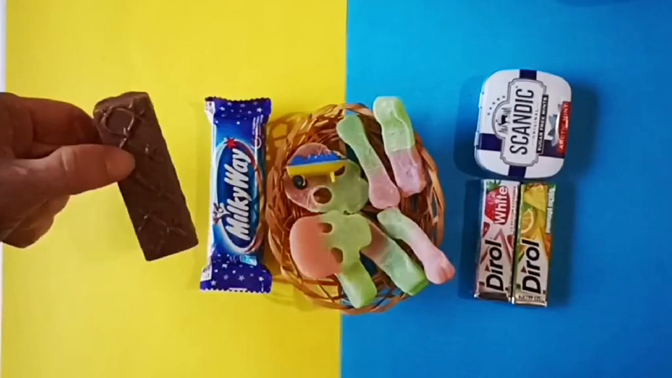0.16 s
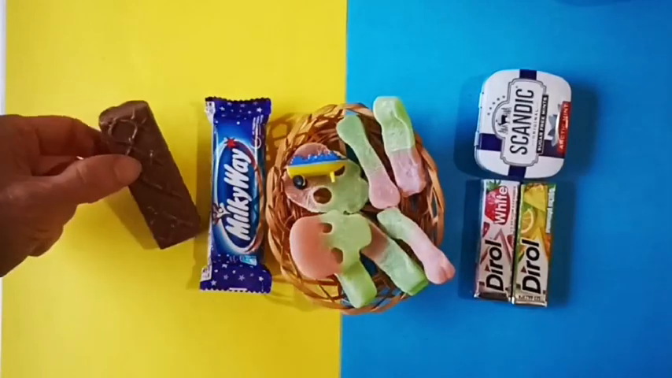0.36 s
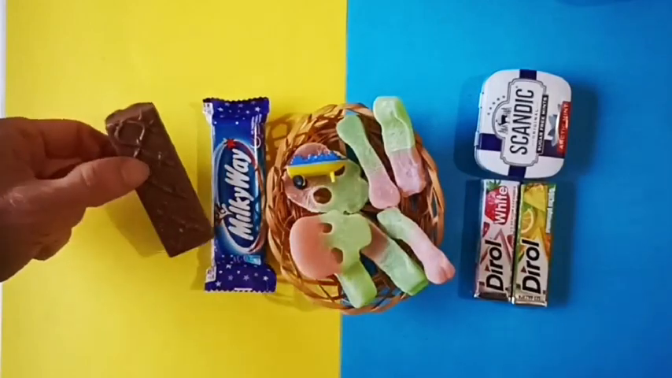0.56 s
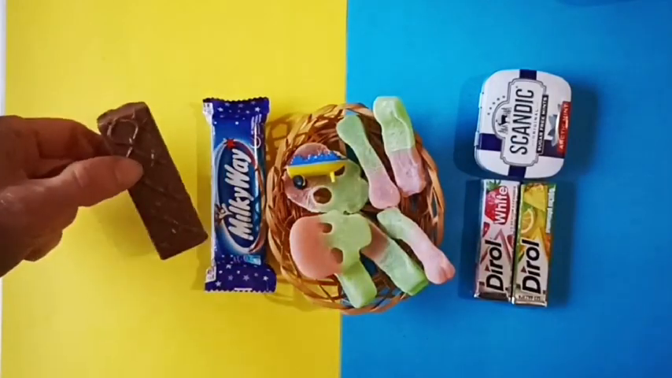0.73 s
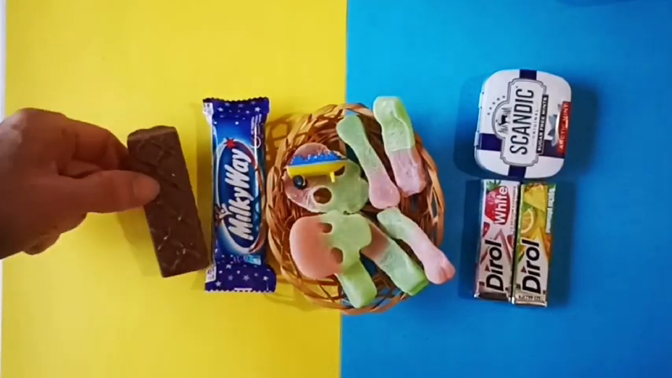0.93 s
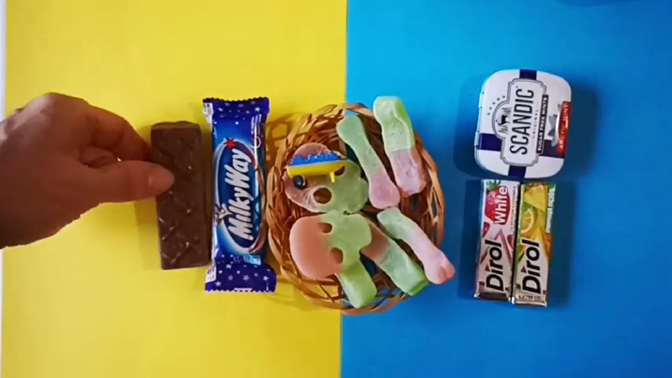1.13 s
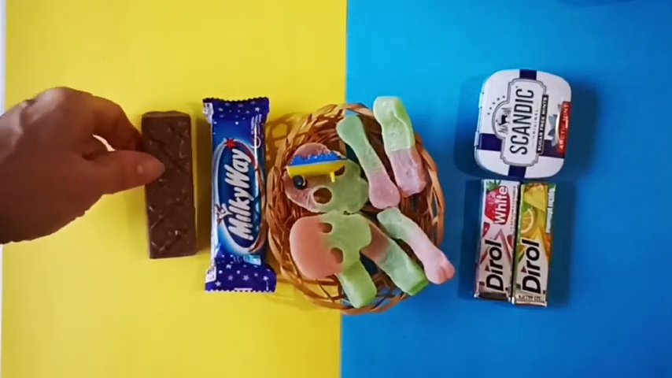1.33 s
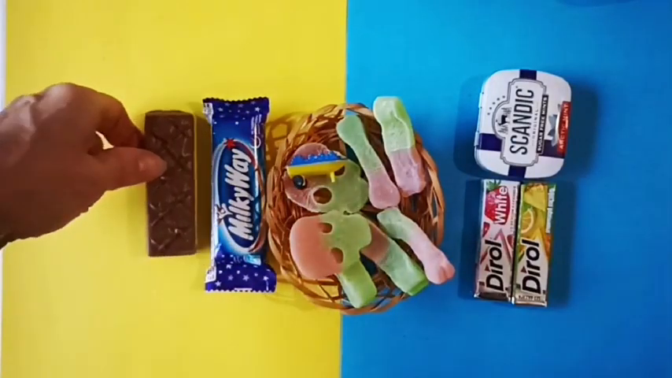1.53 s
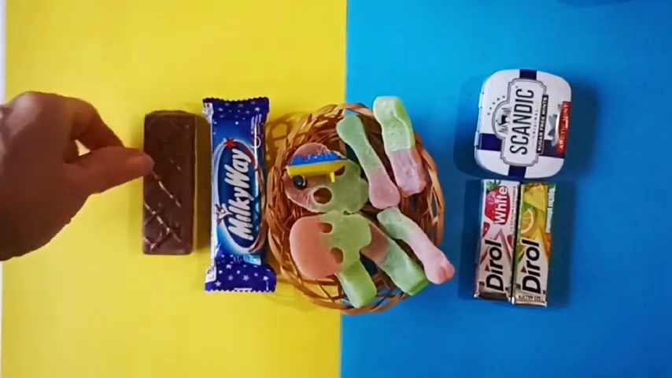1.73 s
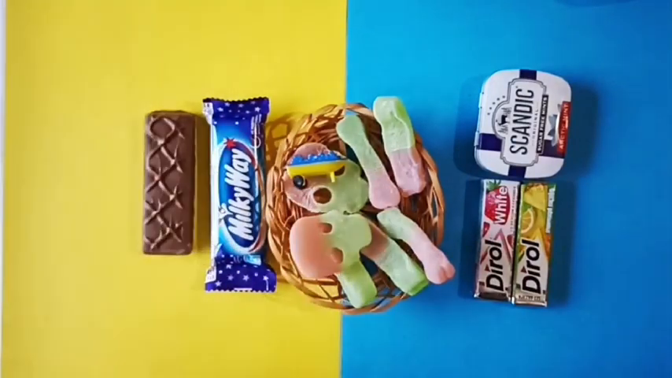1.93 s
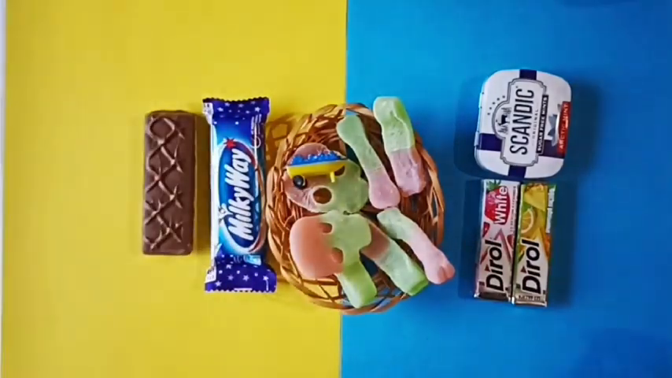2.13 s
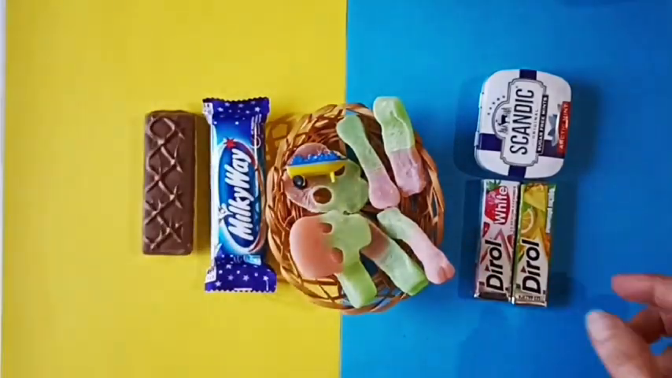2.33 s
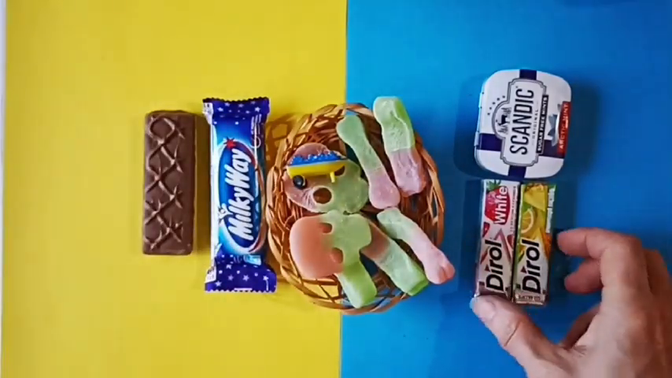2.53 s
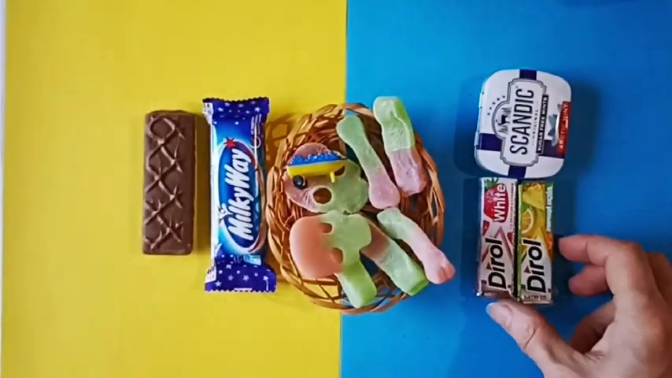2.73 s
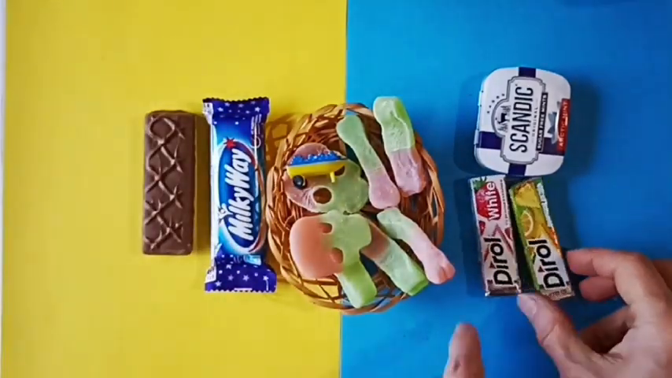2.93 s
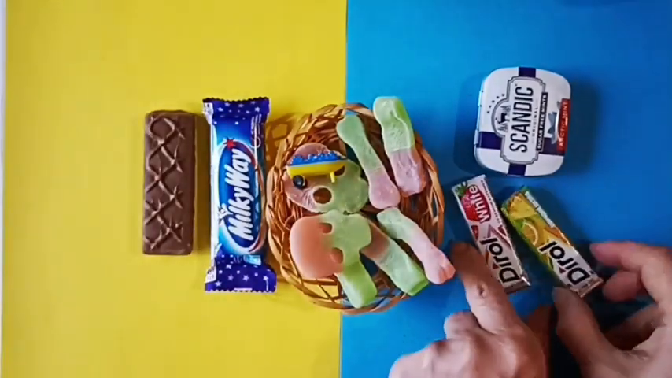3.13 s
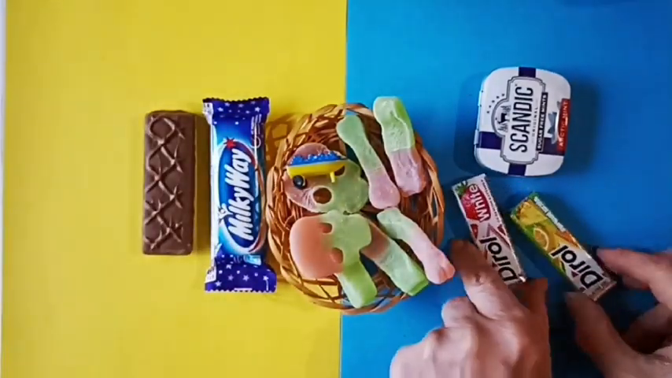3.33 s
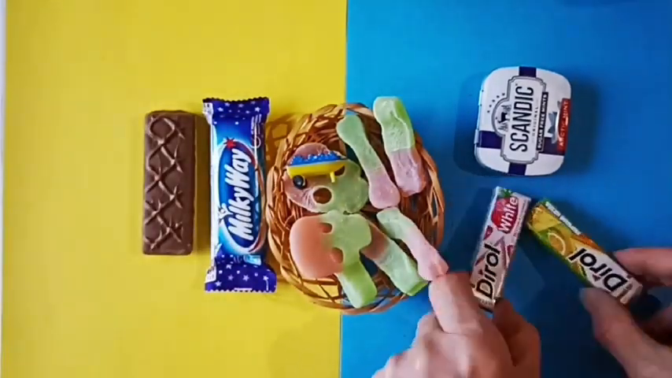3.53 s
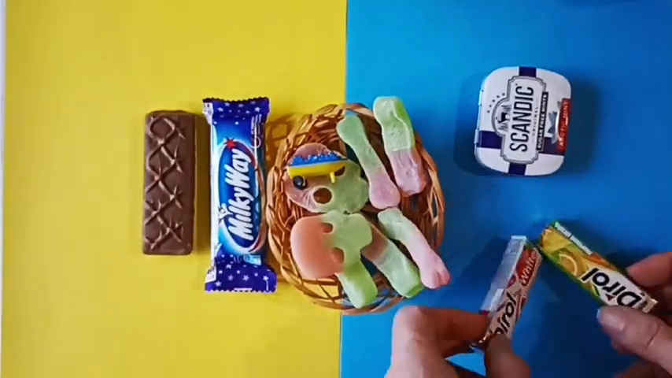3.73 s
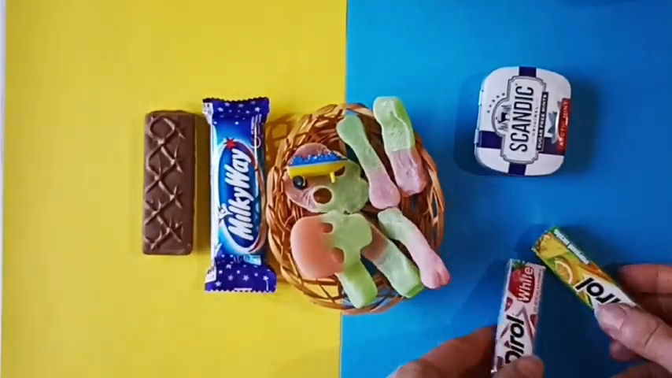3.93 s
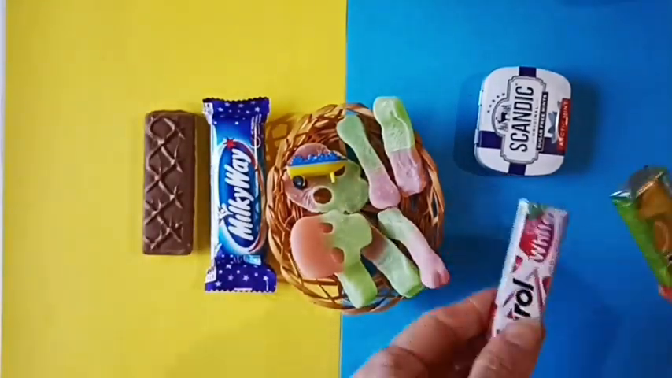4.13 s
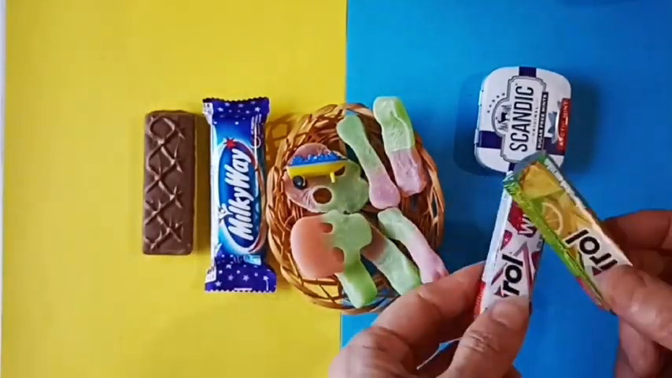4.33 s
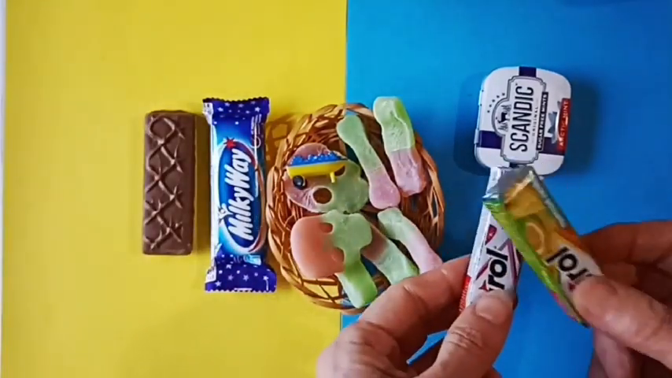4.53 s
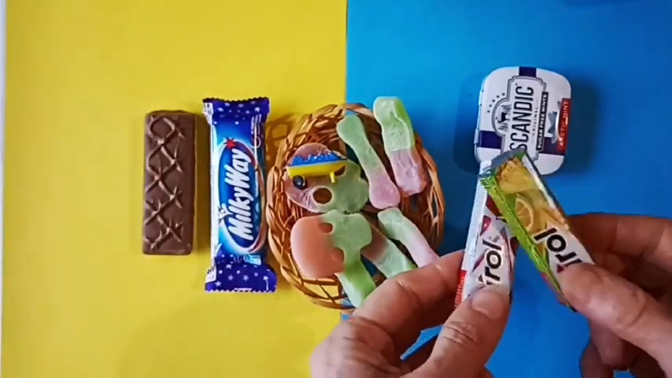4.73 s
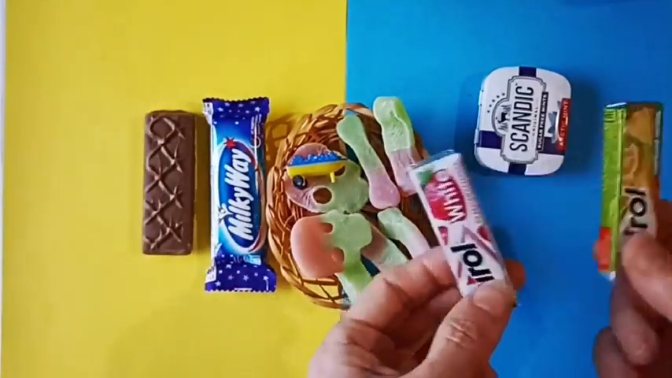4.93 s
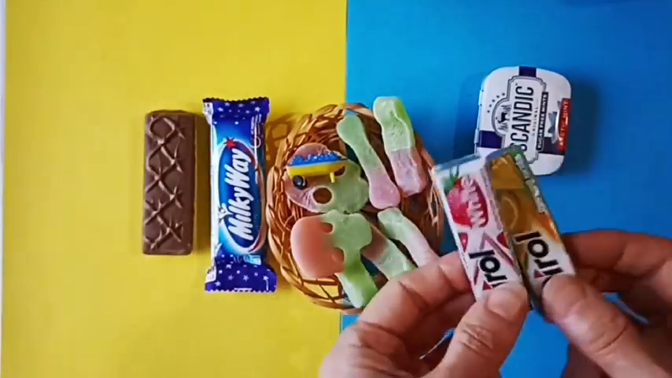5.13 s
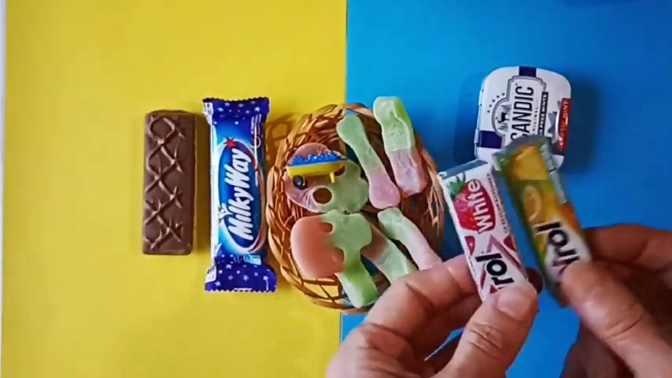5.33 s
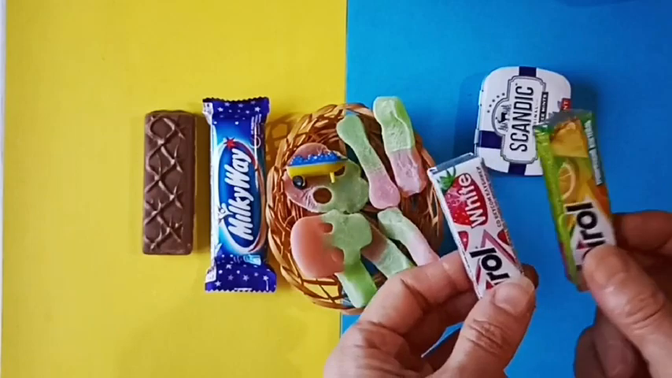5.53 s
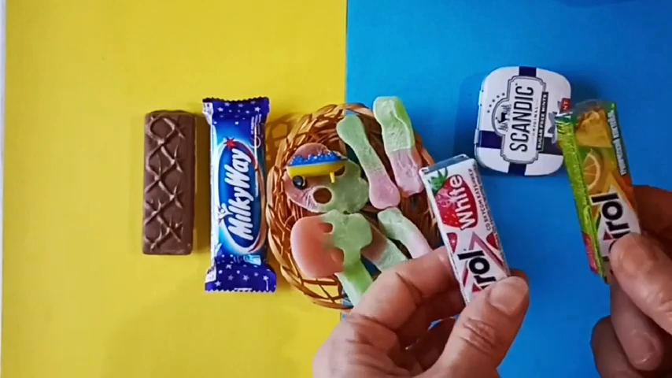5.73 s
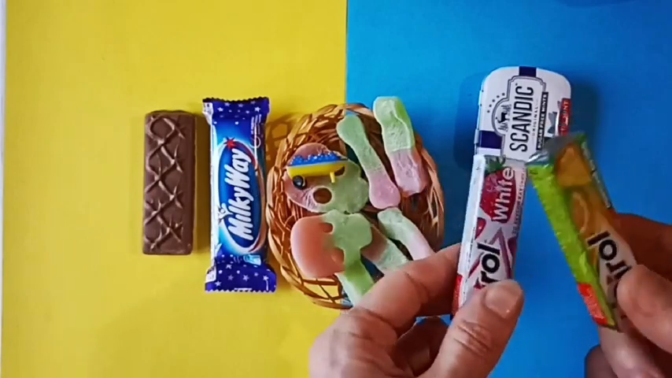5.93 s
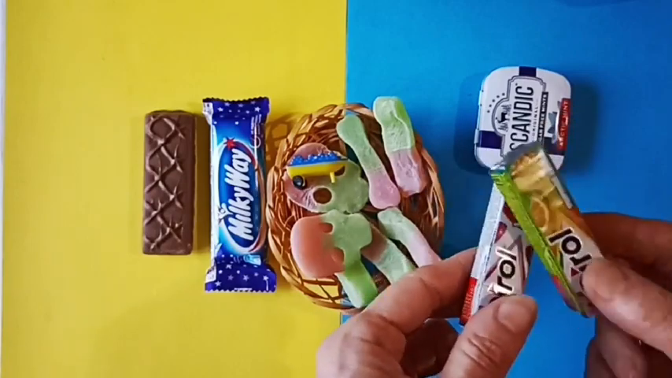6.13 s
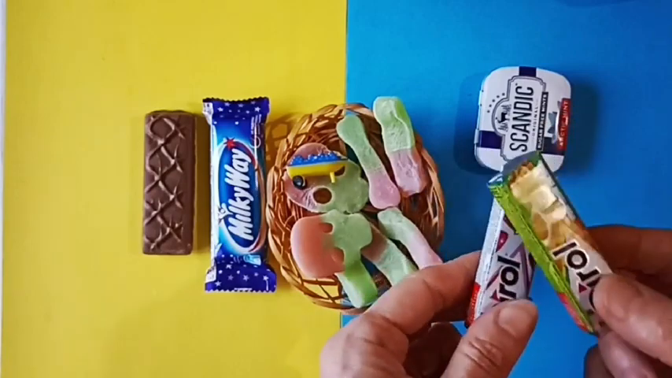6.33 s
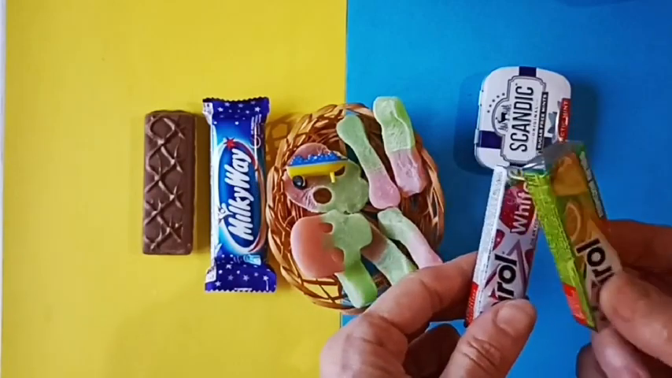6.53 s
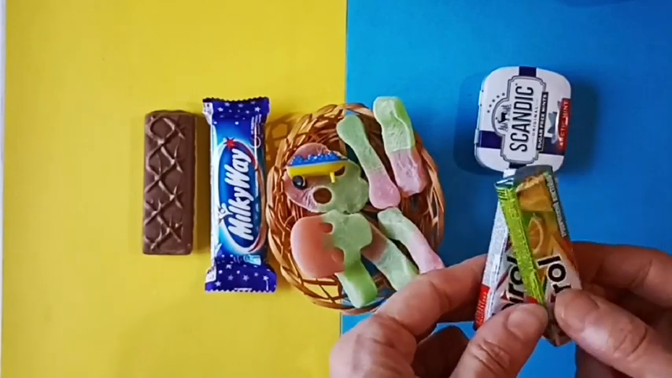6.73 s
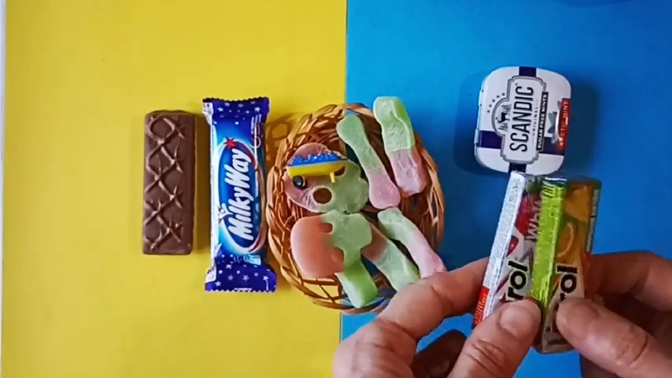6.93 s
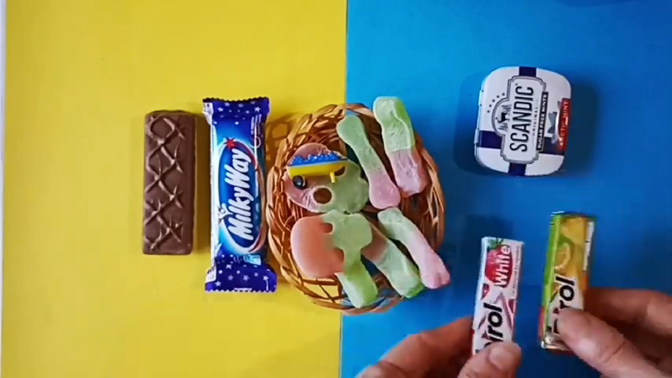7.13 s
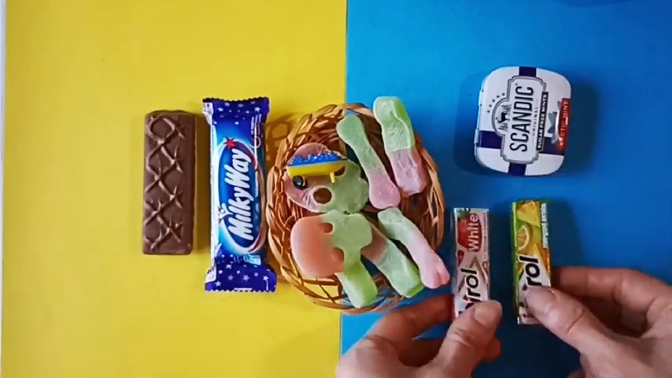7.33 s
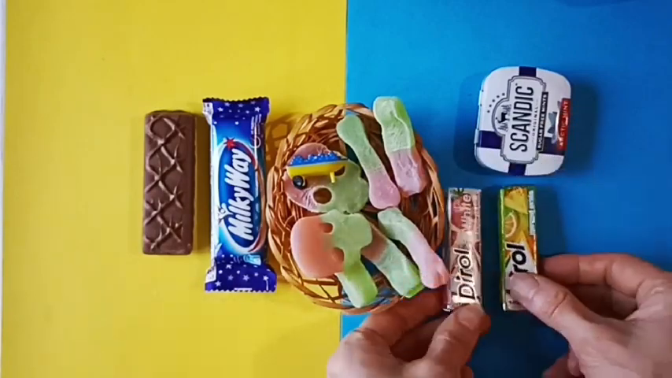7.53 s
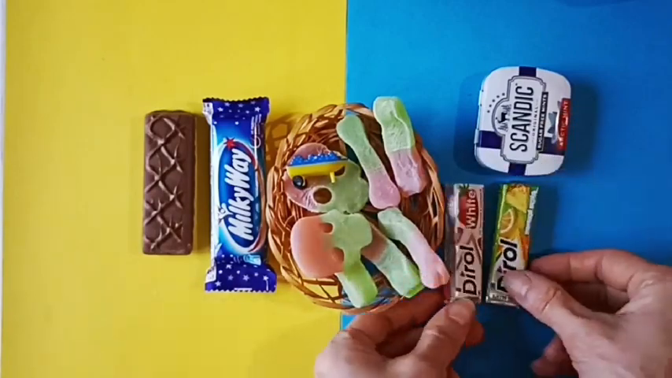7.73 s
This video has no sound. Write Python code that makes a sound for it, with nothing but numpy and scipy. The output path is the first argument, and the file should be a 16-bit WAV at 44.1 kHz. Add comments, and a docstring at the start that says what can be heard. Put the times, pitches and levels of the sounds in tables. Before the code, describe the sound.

A faint room hum lies under close, dry handling sounds. From about 0.3 to 0.7 seconds, slightly to the left, fingers rub a chocolate bar with a fine hiss and tap it lightly on a table three times. It is laid down with one more soft knock at 1.7 seconds. From 2.5 seconds, slightly to the right, two foil-wrapped gum packs are slid and lifted, rustling quietly with scattered crease snaps, the clearest at 3.5 seconds. Then comes the loudest part: the packs are brushed briskly across each other in three groups of four or five short strokes, at about 4.3 to 4.8, 5.0 to 5.6 and 6.0 to 6.6 seconds. Each stroke is a crisp foil scrape, many with a sharp, slightly hollow click as the ends catch. Light rustling and ticks follow, and the packs are put down with a soft scuff around 7.7 seconds.

```python
"""A quiet room hums, close to a small pair of microphone ports. Fingers rub a chocolate bar, tap it and
lay it on a table, whose damped modes answer each impact. They then slide two foil-wrapped gum packs
about and lift them: the wrappers rustle through many micro-contacts, and single creases snap. The packs
are brushed briskly across each other in three groups of strokes, foil chattering on foil, the ends
catching and the hollows resonating. Last, the packs are put down with a scuff."""
import sys
import numpy as np
from scipy import signal
from scipy.io import wavfile
from scipy.ndimage import uniform_filter1d, map_coordinates

SR = 44100
rng = np.random.default_rng(int(sys.argv[2]) if len(sys.argv) > 2 else 0)


def transcribe(signal):
    """Save signal, clipped to [-1, 1], as a 16-bit WAV file at the path in sys.argv[1]."""
    frames = np.atleast_2d(signal).T
    limited = np.clip(frames, -1, 1)
    pcm = np.round(limited * 32767).astype(np.int16)
    wavfile.write(sys.argv[1], SR, pcm)


N = 347062

# normal modes of the table top: f/Hz, level/dB, T60/s
TABLE_MODES = [(111, -12, 0.1622), (138, -3, .04), (215.94, -4, 0.03148), (283.74, -7, 0.077),
               (391.5, -0.5, 0.035), (473, -6.5, 0.013), (630, -10, 0.043), (763, -6.5, 0.016),
               (877, -15, 0.087), (1042.3, -25, 0.048)]
# spectrum of foil scraping on foil: f/Hz, level/dB
FOIL_SPECTRUM = [(590, -26.5), (1000, -8.5), (1180, -18), (1550, -5), (1750, -7), (1910, -4), (2560, -3.5),
                 (2680, -3.5), (3190, 0), (3800, -9), (5500, -6.5), (10100, -19.5), (12500, -16.5),
                 (14800, -19), (16000, -33)]


def from_db(db):
    """Amplitude ratio of a level in decibels."""
    return 10 ** (np.asarray(db) / 20)


def unit_rms(x):
    """Normalisation to a mean square of one."""
    return x / np.sqrt(np.mean(x ** 2) + 1e-20)


def colour(x, spectrum, size=4096):
    """Minimum-phase filter: the phase follows from the log gain by the Hilbert transform."""
    hz, db = np.transpose(spectrum)
    grid = np.abs(np.fft.fftfreq(size, 1 / SR)) + 1
    log_gain = np.interp(np.log(grid), np.log(hz), db) * np.log(10) / 20
    kernel = np.fft.ifft(np.exp(np.conj(signal.hilbert(log_gain)))).real
    return signal.oaconvolve(x, kernel[:size // 2])[:N]


def resonate(x, hz, width_hz):
    """Second-order resonance with unit gain at its peak."""
    r = np.exp(-np.pi * width_hz / SR)
    poles = [1, -2 * r * np.cos(2 * np.pi * hz / SR), r * r]
    return signal.lfilter([(1 - r * r) / 2, 0, (r * r - 1) / 2], poles, x + 1e-18)


def grit(per_s, spread_db):
    """Shot noise: a Poisson train of micro-contacts of uneven size, at unit rms."""
    sizes = from_db(spread_db * np.minimum(rng.exponential(1, N), 5)) * rng.choice([-1, 1], N)
    return unit_rms(sizes * (rng.random(N) < per_s / SR))


def wander(per_s):
    """Random drift: linear interpolation between Gaussian values."""
    steps = np.arange(0, N + SR, SR / per_s)
    return np.interp(np.arange(N), steps, rng.standard_normal(len(steps)))


def swells(times, peak_db, hold, fade, rise_db_per_s):
    """Exponential envelopes: each peaks at its time, holds, then loses 20 dB every fade seconds."""
    out, t = np.zeros(N), np.arange(N) / SR
    for s, db, hold_s, fade_s in np.broadcast(times, peak_db, np.abs(hold), np.abs(fade)):
        near = slice(max(round((s - .2) * SR), 0), round((s + .6) * SR))
        since = t[near] - s
        rise_db = rise_db_per_s * np.minimum(since, 0)
        decay_db = 20 * np.maximum(since - hold_s, 0) / fade_s
        out[near] += from_db(db + rise_db - decay_db)
    return out


def impacts(times, peak_db, shape, t60):
    """Impulsive excitation: a spike and decaying noise pass through shape(x, k), scaled to peak k."""
    out, size = np.zeros(N + SR), SR // 16
    noise = rng.standard_normal((len(times), size))
    noise[:, 0] = 3.66
    decay = from_db(-60 * np.arange(size) / (t60 * SR))
    for k, (s, gain) in enumerate(zip(times, from_db(peak_db))):
        sound = shape(noise[k] * decay, k)[:size]
        at = round(s * SR)
        out[at:at + size] += gain * sound / np.abs(sound).max()
    return out[:N]


def room_tone():
    """Background noise, partly coherent in the bass; narrow-band noise beats with a steady hum."""
    # spectrum of the background: f/Hz, level/dB
    air_spectrum = [(15, -50.5), (25, -15), (153, 0.5), (439, -5), (545, -9.5), (734, -7.5), (818, -12),
                    (2000, -18), (3430, -18.5), (3920, -23.5), (6560, -25.5), (7110, -30), (10400, -30.5),
                    (13600, -24), (16000, -31.5)]
    air_db, hum_db, hum_hz, width_hz = -66, -63.5, 147.1, 25
    left, right, shared = rng.standard_normal((3, N))
    bass = 0.74 * signal.lfilter(*signal.butter(1, 180, fs=SR), shared)
    air = np.array([unit_rms(colour(own + bass, air_spectrum)) for own in (left, right)])
    wavering = resonate(resonate(rng.standard_normal(N), hum_hz, width_hz), hum_hz, width_hz)
    tone = np.sqrt(2) * np.sin(2 * np.pi * hum_hz * np.arange(N) / SR)
    return from_db(air_db) * air + from_db(hum_db) * (tone + 0.31 * unit_rms(wavering))


def finger_rubs():
    """Sliding friction: dry skin on the smooth bar gives a fine, bright hiss."""
    # skin rubbing the bar: t/s, hold/s, level/dB
    rubs = [(0.293, .012, -69), (0.421, 0.022, -56), (0.562, .034, -52), (0.612, 0.041, -60.5),
            (2.172, 0.017, -73.5), (2.283, .002, -69.5)]
    # spectrum of skin friction: f/Hz, level/dB
    skin_spectrum = [(710, -70), (1700, -19), (2920, -0.5), (3950, -4), (5780, -0.5), (10600, -7),
                     (13000, 0.5), (14800, -2.5), (16000, -48)]
    at, hold, db = np.transpose(rubs)
    hiss = unit_rms(colour(grit(per_s=11000, spread_db=1.7), skin_spectrum))
    return swells(at, db, hold, fade=0.018, rise_db_per_s=2500) * hiss


def table_top(force, strength_db):
    """Modal superposition: each mode is a damped oscillator, driven with its own strength."""
    out = 0
    for (hz, level_db, t60), extra_db in zip(TABLE_MODES, strength_db):
        r, w = from_db(-60 / (t60 * SR)), 2 * np.pi * hz / SR
        mode = signal.lfilter([0, np.sin(w)], [1, -2 * r * np.cos(w), r * r], force)
        out = out + from_db(level_db + extra_db) * mode
    return out


def knocks():
    """Impact: the surface ticks, then a force pulse rings the table; a flat landing favours low modes."""
    # the bar landing: t/s, thud level/dB, tick level/dB, tilt of the thud/(dB per octave)
    landings = [(0.341, -27, -39.5, 5), (0.502, -27, -40.5, 5.5), (0.631, -50.5, -48, 2.5),
                (0.652, -34.5, -44, 4.5), (1.673, -26.5, -31, 1.5)]
    at, thud_db, tick_db, tilt = np.transpose(landings)
    octaves = np.log2(np.array(TABLE_MODES)[:, 0] / 300)
    strength_db = rng.normal(0, 2.3, (len(at), len(TABLE_MODES))) + np.outer(tilt, octaves)
    thuds = impacts(at + 0.00106, thud_db, lambda x, k: table_top(np.abs(x), strength_db[k]), t60=0.0021)
    ticks = impacts(at, tick_db, lambda x, k: resonate(x, 3860, 1600) + 0.085 * x, t60=0.011)
    return thuds + ticks


def scuffs():
    """Forced vibration: sparse contacts drive the table's modes as the sweets settle."""
    # sweets settling: t/s, hold/s, level/dB
    settling = [(0.632, .02, -46), (1.241, .004, -59.5), (7.692, 0.031, -53.5), (7.823, 0.025, -51)]
    at, hold, db = np.transpose(settling)
    rumble = unit_rms(table_top(grit(per_s=600, spread_db=1.0), np.zeros(len(TABLE_MODES))))
    return swells(at, db, hold, fade=.035, rise_db_per_s=900) * rumble


def handling():
    """Friction noise: clumps of micro-contacts rustle the wrappers and rumble on the table."""
    # two spells of moving the packs, as breakpoints: t/s, rustle level/dB, rumble re rustle/dB
    moves = [
        [(2.82, -86, -4), (2.85, -63, -11.5), (2.936, -71, 0), (3.122, -63.5, -14), (3.25, -71.5, -12),
         (3.278, -57, -12), (3.36, -68.5, -19), (3.405, -55, -2), (3.44, -63, -14), (3.475, -58, -14),
         (3.55, -64, -12), (3.61, -58, -21), (3.63, -62.5, -20), (3.674, -58, -21), (3.715, -67, -15),
         (3.764, -54.5, 0), (3.83, -69.5, -19), (3.9, -74.5, -10), (3.932, -61.5, -19.5), (4.01, -65.5, -10),
         (4.082, -80, -8), (4.156, -70, -11), (4.27, -89.5, 0)],
        [(6.64, -72.5, 0), (6.674, -63, -10), (6.73, -53.5, -20), (6.744, -66, -21), (6.81, -77, -11.5),
         (6.922, -75.5, -14), (6.946, -63, -10), (7.038, -57.5, -6.5), (7.082, -79, 0), (7.106, -68, -16),
         (7.146, -74.5, -11.5), (7.285, -79.5, -6), (7.3, -65, -12), (7.412, -65, -19), (7.564, -78, -9),
         (7.66, -76, -8), (7.692, -43, 0), (7.71, -44, 0), (7.772, -70, 0), (7.822, -47, -4), (7.87, -68, -2)],
    ]
    # grip shifts and table touches: t/s, hold/s, 20 dB fade/s, rustle level/dB, rumble re rustle/dB
    touches = [(1.007, .002, -0.04, -75, 3), (1.124, .002, .035, -75.5, -15), (1.24, 0.11, .1, -79.5, -1),
               (1.673, .002, .035, -60.5, 1), (2.5, 0.068, 0.23, -72, -10), (2.689, 0.028, 0.08, -69, -8.5),
               (3.493, .002, 0.02, -50.5, 1), (4.287, .002, 0.09, -54.5, -1),
               (4.422, .004, 0.14, -57.5, 1.5), (4.563, .015, 0.07, -61.5, 3),
               (4.691, .03, .05, -64.5, -0.5), (4.912, .004, .1, -68, -9), (5.085, .01, .1, -61, -2),
               (5.193, .002, .022, -51, 2), (5.268, .002, .03, -64, -14), (5.4, .04, .05, -74, -5),
               (5.55, .03, .05, -75, -5), (5.731, .002, 0.45, -70, -16.5), (6.124, 0.0089, 0.34, -62, -2.5),
               (6.573, .01, .1, -63, -7.5), (7.79, .004, .02, -56, -21.5)]
    # spectrum of the wrappers' rustle: f/Hz, level/dB
    wrapper_spectrum = [(880, -20.5), (1500, -17.5), (2020, -6.5), (2370, -0.5), (3520, -3.5), (6370, -8),
                        (10800, -14), (12100, -11), (14900, -15), (16000, -27.5)]
    t, gain, low_db = np.arange(N) / SR, np.zeros(N), np.zeros(N)
    for move in moves:
        at, db, relative_db = np.transpose(move)
        on = (t >= at[0]) & (t <= at[-1])
        gain[on] = from_db(np.interp(t[on], at, db))
        low_db[on] = np.interp(t[on], at, relative_db)
    gain = uniform_filter1d(gain, size=90)
    at, hold, fade, db, relative_db = np.transpose(touches)
    rustle = gain + swells(at, db, hold, fade, rise_db_per_s=1600)
    rumble = gain * from_db(low_db) + swells(at, db + relative_db, hold, fade, rise_db_per_s=1600)
    contacts = grit(per_s=11000, spread_db=1.7) * from_db(wander(per_s=60))
    drag = unit_rms(resonate(resonate(contacts, 1300, 1800), 1300, 1800))
    return rustle * unit_rms(colour(contacts, wrapper_spectrum)) + rumble * drag


def creases():
    """Buckling: a crease of the wrapper snaps and excites one broad resonance."""
    # single creases: t/s, level/dB, f/Hz
    snaps = [(1.0076, -57.5, 3366), (1.125, -60, 2850), (2.2835, -52.5, 8700), (2.4983, -55, 3380),
             (2.7072, -46, 4178), (2.8569, -44.5, 3310), (3.4316, -46, 12500), (3.491, -31, 2570),
             (3.717, -40, 6469), (3.9909, -39.5, 2450), (4.287, -38.5, 3560), (5.141, -44, 3350),
             (5.221, -33, 2704), (5.2696, -47, 6130), (5.7336, -46, 6400), (5.798, -53.5, 5489),
             (7.0946, -52, 6703), (7.301, -39, 3340), (7.4047, -39.5, 4610), (7.79, -44, 5825)]
    at, db, hz = np.transpose(snaps)
    return impacts(at, db, lambda x, k: resonate(x, hz[k], 0.16 * hz[k]) + 0.11 * x, t60=0.011)


def pack_hollow(x):
    """Cavity resonance: the broad low modes of a gum pack add with alternating sign."""
    # modes of the hollow: f/Hz, bandwidth/Hz, level/dB
    modes = [(373.48, 84, -11), (665, 195, -2), (898, 281, 3), (1270, 490, -7.5)]
    return sum((-1) ** k * from_db(db) * resonate(x, hz, width) for k, (hz, width, db) in enumerate(modes))


def strokes():
    """Roughness excitation: foil ridges chatter over each other; fewer, larger bumps shake the pack."""
    # pack brushing pack: t/s, lead of first touch/s, full contact/s, foil level/dB, body level/dB
    brushings = [(4.327, 0.012, .001, -33.5, -30), (4.469, 0.015, 0.002047, -30.5, -32),
                 (4.596, 0.013, 0.013, -33, -36), (4.748, 0.01547, .001, -33, -32.5),
                 (5.037, 0.00745, 0.023, -40, -41), (5.170, .008, 0.015567, -40, -42),
                 (5.334, 0.017, 0.001067, -35.5, -31.5), (5.473, 0.021, 0.001218, -35.5, -30.5),
                 (5.617, 0.019, 0.000765, -31.5, -30), (6.025, 0.012168, 0.016782, -31.5, -40),
                 (6.188, 0.019, 0.0025, -30.5, -31.5), (6.31, .01, 0.023, -38, -46),
                 (6.455, .012, 0.021, -37, -44), (6.621, .011, 0.00067, -31.5, -30)]
    at, lead, hold, foil_db, body_db = np.transpose(brushings)
    # the packs graze, press, then keep rustling as they part
    graze = swells(at - lead, foil_db - 15.5, lead, fade=0.015, rise_db_per_s=2999.5)
    press = swells(at, foil_db, hold, fade=0.015, rise_db_per_s=1900)
    trail = swells(at, foil_db - 21.5, hold, fade=0.07, rise_db_per_s=1900)
    shake = swells(at, body_db, hold, fade=.012, rise_db_per_s=3200) + from_db(-8) * trail
    chatter = unit_rms(colour(grit(per_s=6000, spread_db=2.4), FOIL_SPECTRUM))
    bumps = unit_rms(pack_hollow(grit(per_s=1600, spread_db=2.9)))
    return (graze + press + trail) * chatter + shake * bumps


def catches():
    """Collision: the ends catch, the foil cracks, the hollow rings and the halted mass gives a low push."""
    # pack ends catching: t/s, crack level/dB, body level/dB, push level/dB, foil ring f/Hz
    collisions = [(4.3257, -8.5, -23.5, -65, 3160), (4.4691, -11, -26.5, -37, 1840),
                  (4.595, -31.5, -33, -56, 3395), (4.7481, -10.5, -35, -36, 3161),
                  (5.0414, -24.5, -31, -51, 3160), (5.0537, -17.5, -28, -65, 3050),
                  (5.3343, -17, -30.5, -62, 2700), (5.4712, -12.5, -20.5, -53, 2975),
                  (5.6155, -15, -25, -45, 3300), (6.188, -11, -29, -27, 2109),
                  (6.6185, -11, -25.5, -32, 1910)]
    at, crack_db, body_db, push_db, hz = np.transpose(collisions)

    def foil(x, k):
        return colour(x, FOIL_SPECTRUM)[:len(x)] + 0.04 * x + 0.34 * resonate(x, hz[k], 600)

    crack = impacts(at, crack_db, foil, t60=0.012)
    thump = impacts(at, body_db, lambda x, k: pack_hollow(x), t60=0.0094)
    push = impacts(at, push_db, lambda x, k: resonate(resonate(x, 320, 300), 390, 300), t60=0.0069)
    return crack + thump + push


def ports(x, left_lag_samples, sway_samples):
    """Path difference: a near source reaches the ports at different times, varying as it moves."""
    left_index = np.arange(N) - left_lag_samples - sway_samples * wander(per_s=12)
    return np.array([map_coordinates(x, [left_index], order=3), x])


def echoes(x):
    """Scattering by hands and table, then room reverberation, different at each port."""
    scatter_db, scatter_t60, room_db, room_t60 = -10, .012, -12, .14
    t = np.arange(SR // 5) / SR
    scatter = from_db(scatter_db - 60 * t / scatter_t60) / np.sqrt(scatter_t60 * SR / 14)
    room = from_db(room_db - 60 * t / room_t60) / np.sqrt(room_t60 * SR / 14)
    tails = rng.standard_normal((2, 2, len(t))) * (scatter + room) * (t > .0004)
    tails = signal.lfilter(*signal.butter(1, 500, "high", fs=SR), tails)  # long waves reach both alike
    turn = 2.78 * wander(per_s=30)  # moving hands blend two sets of echoes
    return np.array([signal.oaconvolve(x * np.cos(turn), a)[:N] + signal.oaconvolve(x * np.sin(turn), b)[:N]
                     for a, b in tails])


def scene():
    """Superposition at two ports, each with its own response: the bar lies left, the packs right."""
    # response of the left port over the right: f/Hz, level/dB
    port_difference = [(200, -1), (700, 2), (1300, -1), (2200, -3.5), (3300, -5.5), (4500, -6.5),
                       (6000, -8), (8000, -3), (10000, 0), (12500, 10), (15000, 9.5)]
    background = room_tone()
    bar = finger_rubs() + knocks() + scuffs()
    packs = handling() + creases() + strokes() + catches()
    direct = ports(bar, left_lag_samples=-3.5, sway_samples=1.33)
    direct += ports(packs, left_lag_samples=4.3, sway_samples=2.83)
    mic_low_cut = signal.butter(3, 107, "high", fs=SR, output="sos")
    left, right = signal.sosfilt(mic_low_cut, direct + echoes(bar + packs))
    left = colour(left, np.array(port_difference) * [1, .5])
    right = colour(right, np.array(port_difference) * [1, -.5])
    return np.array([left, right]) + background


def record(dry):
    """Band limiting: a steep low-pass filter removes the highest treble."""
    stopband_hz = 15800 * 1.04
    return signal.sosfilt(signal.cheby2(12, 55, stopband_hz, fs=SR, output="sos"), dry)


dry = scene()
out = record(dry)
transcribe(out)
```